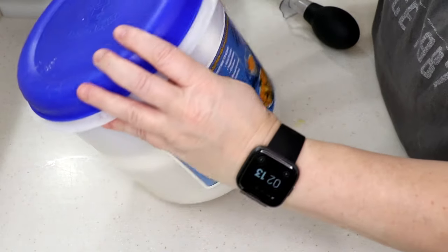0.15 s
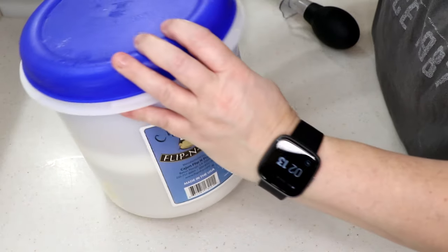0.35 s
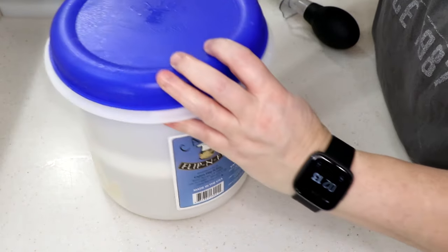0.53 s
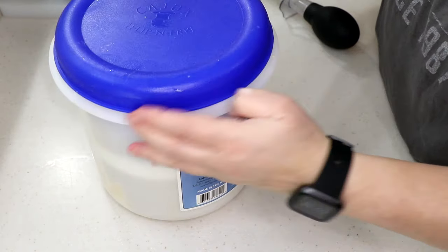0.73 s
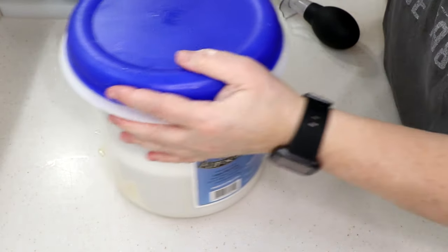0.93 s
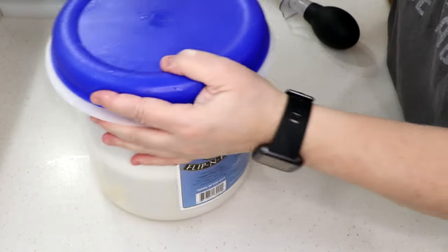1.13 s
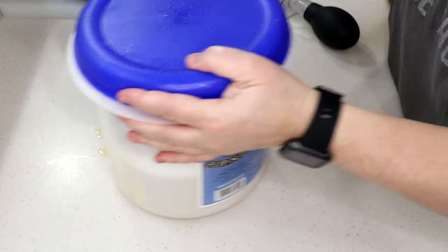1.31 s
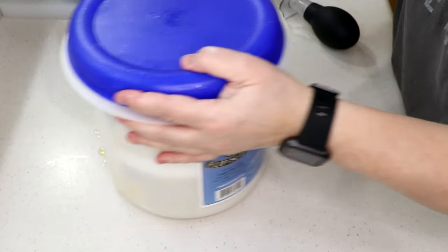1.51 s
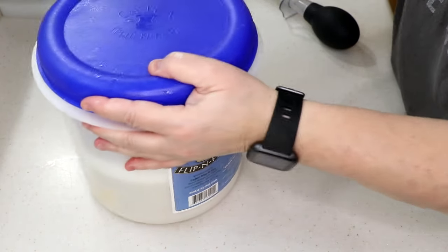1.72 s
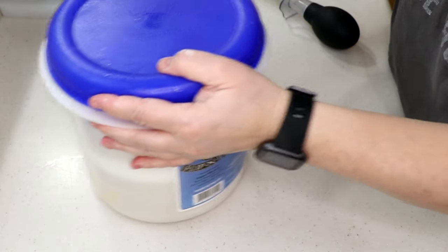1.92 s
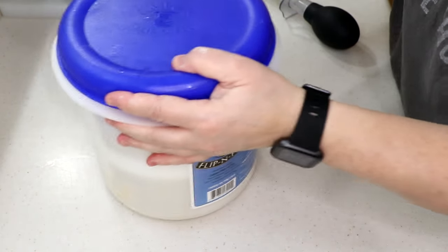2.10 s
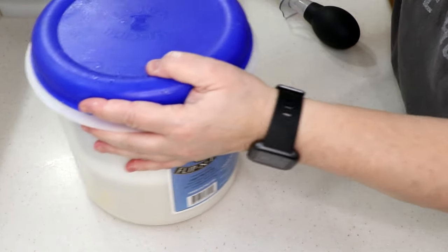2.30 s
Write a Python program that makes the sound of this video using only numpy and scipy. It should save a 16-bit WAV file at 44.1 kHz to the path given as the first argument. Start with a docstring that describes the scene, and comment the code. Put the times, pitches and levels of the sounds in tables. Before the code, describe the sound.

A lidded plastic tub lands on a counter with a hollow boom, fingers squeak briefly on the lid, then quick to-and-fro scraping with knocks and lid ticks; close microphone, small kitchen, faint hum.

```python
"""Mains hum and room noise run throughout. A lidded plastic tub is set down on a kitchen counter:
its base thumps and scrapes (struck modes, filtered grit). Fingers then slip on the lid as it is
gripped (stuttering clicks through resonances). Last the tub is shuffled to and fro: strokes of
scraping, further thumps, and pitched ticks of the loose lid. A short diffuse tail follows the tub."""
import sys
import numpy as np
from scipy import signal
from scipy.fft import rfft, irfft
from scipy.io import wavfile
from scipy.ndimage import uniform_filter1d

SR = 44100
rng = np.random.default_rng(int(sys.argv[2]) if len(sys.argv) > 2 else 0)


def dump(signal):
    """Clip the signal to [-1, 1] and save it as 16-bit WAV at the path in sys.argv[1]."""
    limited = np.clip(np.atleast_2d(signal).T, -1, 1)
    pcm = np.round(limited * 32767).astype(np.int16)
    wavfile.write(sys.argv[1], SR, pcm)


N = 103635

# mains hum partials: multiple, level_db
HUM_PARTIALS = [(1, -44), (3, -49.5), (4, -61.5), (5, -60), (6, -67.5), (7, -58.5), (10, -63)]
HUM_HZ = 60

# room noise spectrum: freq_hz, density_db_per_hz
AIR_SPECTRUM = [(15, -73), (25, -23.5), (64, -5), (91, -32), (179, -4.5), (234, -14.5), (360, -7),
                (391, -18.5), (540, -19), (1000, -23), (15700, -44)]
AIR_DB = -46.5
ROOM_DB, ROOM_T60_S = -11.5, 0.43

# lid ticks: start_s, level_db, pitch_hz
TICKS = [(1.077, -25, 1570), (1.154, -33, 1435), (1.177, -31, 1390), (1.2133, -27, 1544),
         (1.337, -15, 1603), (1.4595, -26, 1575), (1.557, -30, 1400), (1.7455, -29.5, 1503),
         (1.7605, -23, 1497), (1.9151, -21.5, 1535), (1.9937, -32.5, 1410), (2.0413, -25.5, 1506),
         (2.195, -21.5, 1590), (2.3216, -26, 1545)]
# lid modes: ratio_to_pitch, level_db, t60_s
LID_MODES = [(1.0, 0, .03), (1.45, -11, .02), (2.3, -20, .015), (.38, -14, .03)]
TICK_RISE_S = 0.00044

# fingers slipping on the lid: start_s, length_s, level_db, strongest_near_hz
SLIPS = [(.665, .007, -48, 4460), (0.675, 0.0034, -44, 2270), (.812, 0.0057, -29, 1970),
         (.8215, 0.0058, -27.5, 2280), (0.8269, 0.0046, -24.5, 2860), (0.8336, 0.0039, -33.5, 1880),
         (0.842, .01, -39, 3320), (.860, 0.0043, -34, 2620), (.867, 0.0016, -43, 2500)]
# lid resonances under the fingers: freq_hz, width_hz, level_db
SLIP_PEAKS = [(1785, 320, 6), (2230, 230, 4), (2830, 190, 2), (4000, 160, -2), (5700, 900, 4)]
# slip fizz spectrum: freq_hz, density_db_per_hz
SLIP_SPECTRUM = [(400, 7), (1500, -11), (7000, -11), (15500, -16)]
SLIP_FIZZ_DB, SLIP_TOP_HZ, SLIP_TAIL_S = -11, 6750, 0.0021
SPOT_DB = -14  # fall one octave away from the strongest pitch

# base sliding on the counter: start_s, length_s, fastest_at_share, level_db, mid_rel_db, rumble_rel_db
STROKES = [(0.212, 0.26, 0.34, -56.5, 9.5, 8.5), (0.749, 0.26, 0.4, -56.5, 0, -20),
           (0.951, 0.16, 0.59, -39, -7.5, -4), (1.108, 0.15, 0.58, -41.5, -2.5, 0),
           (1.257, 0.12, 0.55, -38.5, -1.5, 0.5), (1.368, 0.15, 0.57, -39.5, -2, 1),
           (1.526, 0.13, 0.46, -42, 0, 5.5), (1.65, 0.16, 0.52, -43, -2, 1.5),
           (1.822, 0.11, 0.41, -44.5, 0, 6.5), (1.927, 0.16, 0.61, -44.5, -0.5, 1.5),
           (2.096, 0.12, 0.49, -45.5, 3.5, 4), (2.219, 0.15, 0.56, -46.5, 0, 4.5)]
# sliding hiss spectrum: freq_hz, density_db_per_hz
HISS_SPECTRUM = [(1290, -2.5), (2200, -37.5), (2750, -12), (2960, -11), (3130, -6.5), (3540, -0.5),
                 (4500, -8.5), (5480, -0.5), (7240, -13), (14700, -21.5), (15700, -34)]
# wall resonances while sliding, before shift per stroke: freq_hz, width_hz, level_db
SCRAPE_PEAKS = [(560, 62, 2), (895, 40, 1.5), (1224, 620, 4.5), (1484, 51, 4), (1790, 50, -6.5)]
# low resonances while sliding: freq_hz, width_hz, level_db
RUMBLE_PEAKS = [(46.4, 41, 0), (127, 54, -12), (206.6, 15, -4.5), (331, 110, -5)]
GRIT_PER_S, GRIT_DB, BUMPS_PER_S, BUMP_DB = 14000, 1.5, 1500, 2.5
SCRAPE_SHIFT = 0.04  # random pitch shift per stroke, standard deviation as a share
UNEVEN_DB, UNEVEN_S = 1.3, 0.016
SPEED_POWER = 0.71  # stroke gain = speed ** this
FIZZ_FROM_HZ, FIZZ_POWER = 4540, 0.78

# base meets counter: start_s, boom_db, boom_rise_s, wall_db, crack_db
THUMPS = [(0.213, -33, 0.0036, -44, -54), (0.2393, 0, 0.0019, -9, -24), (0.299, -13.5, 0.0033, -40, -49),
          (0.3789, -24, 0.0045, -40, -43), (0.456, -36, .006, -53, -68), (.664, -37, 0.0026, -28, -44),
          (.674, -24.5, 0.00054, -34.5, -40), (0.988, -41, 0.0038, -21, -43),
          (1.114, -34.5, 0.004, -31, -66), (1.270, -25, 0.0022, -29, -40.5), (1.283, -36, 0.0018, -34, -57),
          (1.332, -21, 0.0013, -23.5, -28.5), (1.458, -29.5, 0.0042, -49, -49),
          (1.574, -28, 0.0008, -31, -30.5), (1.580, -24.5, 0.0016, -12, -45),
          (1.589, -30.5, 0.00076, -18, -43), (1.8727, -29.5, 0.0029, -5.5, -43),
          (1.878, -38, 0.00099, -36, -33), (1.997, -31.5, 0.0025, -33.5, -40)]
# air and base modes, settled, ungripped: freq_hz, level_db, t60_s
BOOM_MODES = [(89, -13, .1), (140.6, -0.5, 0.061), (197.2, 1, 0.21), (261, -18.5, 0.16), (346, -22, .15)]
# wall modes, ungripped: freq_hz, level_db, t60_s
WALL_MODES = [(401, 6, 0.026), (498, -6, .05), (606, -3, .04), (697, -18.5, 0.035), (812, -4.5, .03),
              (1327, -4.5, 0.034), (1543, 6.5, .016)]
WALL_RISE_S, CRACK_T60_S, CRACK_TOP_HZ, LOW_CUT_HZ = 0.0033, 0.024, 4860, 44.5
SHARP, SHARP_S = 0.22, 0.0083  # base starts sharp under load (share of pitch) and settles
FREE_S, SETTLE_S = 0.043, 0.013  # boom rings freely, then contents and counter smother it
GRIPPED_S, GRIP_DAMP = 1, 0.63  # once both hands hold on, boom and wall t60 shrink by this factor
SOFT = 0.27  # a slower contact dulls the wall modes: blow length as share of rise

EDGE_HZ = 15860
RING_TIME_S = np.arange(SR // 3) / SR


def amp(db):
    """Decibels to amplitude."""
    return 10 ** (np.asarray(db, float) / 20)


def evened(x):
    """Scales x to unit RMS."""
    return x / np.sqrt(np.mean(x ** 2) + 1e-20)


def add(mix, start_s, sound):
    """Adds sound into mix in place, cut at the end."""
    part = mix[round(start_s * SR):][:len(sound)]
    part += sound[:len(part)]


def colour(x, points):
    """Filters x by a spectrum of (freq_hz, db) points, interpolated over log frequency; unit RMS."""
    hz = np.fft.rfftfreq(len(x), 1 / SR)
    point_hz, point_db = np.transpose(points)
    gain_db = np.interp(np.log(hz + 1), np.log(point_hz + 1), point_db)
    return evened(irfft(rfft(x) * amp(gain_db), len(x)))


def resonate(x, peaks):
    """Sum of band-pass resonances (freq_hz, width_hz, level_db), unit RMS."""
    bands = (amp(db) * evened(signal.lfilter(*signal.iirpeak(hz, hz / width_hz, SR), x))
             for hz, width_hz, db in peaks)
    return evened(sum(bands))


def ring(modes, pitch=1, sharp=0, damp=1):
    """Dying sines of an object struck once; they may start sharp."""
    t = RING_TIME_S
    bent_s = t + sharp * SHARP_S * (1 - np.exp(-t / SHARP_S))
    return sum(amp(db - 60 * t / (t60_s * damp)) * np.sin(2 * np.pi * f * pitch * bent_s)
               for f, db, t60_s in modes)


def grit(per_s, spread_db):
    """Dense random clicks of uneven size."""
    size = amp(spread_db * np.minimum(rng.exponential(1, N), 4))
    return size * rng.standard_normal(N) * (rng.random(N) < per_s / SR)


def kitchen():
    """Mains hum of an appliance, as steady harmonics, over steady room noise."""
    t = np.arange(N) / SR
    hum = sum(amp(db) * np.sin(2 * np.pi * (k * HUM_HZ * t + rng.random())) for k, db in HUM_PARTIALS)
    return hum + amp(AIR_DB) * colour(rng.standard_normal(N), AIR_SPECTRUM)


def room(x):
    """A short diffuse tail: x convolved with decaying, darkened noise."""
    t = np.arange(SR // 2) / SR
    noise = signal.lfilter([1], [1, -.6], rng.standard_normal(len(t)))
    tail = noise * amp(-60 * t / ROOM_T60_S) * (t > .004)
    return signal.fftconvolve(x, tail / np.linalg.norm(tail))[:N]


def ticks():
    """The loose lid taps the rim and rings its modes."""
    out = np.zeros(N)
    rise = (1 - np.exp(-RING_TIME_S / TICK_RISE_S)) ** 2
    for start_s, db, pitch_hz in TICKS:
        add(out, start_s, amp(db) * ring(LID_MODES, pitch_hz) * rise)
    return out


def slips():
    """Short bursts of skin stuttering on plastic ring the lid; each spot favours other modes."""
    out, t = np.zeros(N), np.arange(SR // 20) / SR
    stutter = grit(7000, 0.66)
    fizz = amp(SLIP_FIZZ_DB) * colour(rng.standard_normal(N), SLIP_SPECTRUM)
    top_cut = signal.butter(4, SLIP_TOP_HZ, fs=SR)
    for start_s, length_s, db, near_hz in SLIPS:
        attack = np.clip(t / 0.001, 0, 1)
        release = np.exp(-np.maximum(t - length_s, 0) / SLIP_TAIL_S)
        spot = [(hz, width_hz, peak_db + SPOT_DB * np.log2(hz / near_hz) ** 2)
                for hz, width_hz, peak_db in SLIP_PEAKS]
        lid = signal.lfilter(*top_cut, resonate(stutter, spot))
        burst = (lid + fizz)[round(start_s * SR):][:len(t)]
        add(out, start_s, amp(db) * attack * release * burst)
    return out


def uneven():
    """Slow random change of grip pressure, as a gain drawn separately for three bands."""
    size = round(UNEVEN_S * SR)
    drift = uniform_filter1d(uniform_filter1d(rng.standard_normal((3, N)), size), size)
    return amp(UNEVEN_DB * evened(drift))


def slide():
    """Grit under the base: hiss, wall scrape and low bumps swell per stroke; top fizz needs speed."""
    t = np.arange(N) / SR
    gates, pace, scrape = np.zeros((3, N)), np.zeros(N), np.zeros(N)
    shifts = SCRAPE_SHIFT * rng.standard_normal(len(STROKES))
    fine, coarse = grit(GRIT_PER_S, GRIT_DB), grit(BUMPS_PER_S, BUMP_DB)
    for (start_s, length_s, fastest, db, mid_db, low_db), shift in zip(STROKES, shifts):
        progress = np.clip((t - start_s) / length_s, 0, 1)
        skew = np.log(.5) / np.log(fastest)  # puts the top speed at that share of the stroke
        speed = np.abs(np.sin(np.pi * progress ** skew))
        gates += amp([[db], [db + mid_db], [db + low_db]]) * speed ** SPEED_POWER
        pace = np.maximum(pace, speed)
        peaks = np.multiply(SCRAPE_PEAKS, [1 + shift, 1, 1])
        begun = t > start_s
        scrape[begun] = resonate(coarse + 1.03 * fine, peaks)[begun]
    gates *= uneven()
    hiss = colour(fine, [(900, -63)] + HISS_SPECTRUM)
    dull = signal.filtfilt(*signal.butter(2, FIZZ_FROM_HZ, fs=SR), hiss)
    hiss = dull + (hiss - dull) * pace ** FIZZ_POWER
    return gates[0] * hiss + gates[1] * scrape + gates[2] * resonate(coarse, RUMBLE_PEAKS)


def thumps():
    """Each contact rings the air and base of the tub, its walls, and gives a short noise crack."""
    out, t = np.zeros(N), RING_TIME_S
    smother = np.exp(-(np.maximum(t - FREE_S, 0) / SETTLE_S) ** 2)
    crack_band = signal.butter(3, [450, CRACK_TOP_HZ], "band", fs=SR)
    cracks = signal.lfilter(*crack_band, rng.standard_normal((len(THUMPS), len(t))))
    cracks = signal.lfilter([1], [1, -.85], cracks)  # darker
    for (start_s, boom_db, rise_s, wall_db, crack_db), crack in zip(THUMPS, cracks):
        damp = GRIP_DAMP if start_s > GRIPPED_S else 1
        boom = ring(BOOM_MODES, sharp=SHARP, damp=damp) * smother * (1 - np.exp(-t / rise_s))
        blow = np.hanning(round(SOFT * rise_s * SR) + 3)
        wall = ring(WALL_MODES, damp=damp) * (1 - np.exp(-t / WALL_RISE_S))
        wall = signal.lfilter(blow / blow.sum(), 1, wall)
        crack = amp(crack_db - 60 * t / CRACK_T60_S) * crack
        add(out, start_s, amp(boom_db) * boom + amp(wall_db) * wall + crack)
    return signal.lfilter(*signal.butter(2, LOW_CUT_HZ, "high", fs=SR), out)


def scene():
    """Tub, lid ticks and kitchen; only the tub above 500 Hz feeds the room tail."""
    tub = thumps() + slips() + slide()
    high = signal.lfilter(*signal.butter(2, 500, "high", fs=SR), tub)
    return (tub + ticks() + amp(ROOM_DB) * room(high) + kitchen())[None]


def record(dry):
    """Band limit of the recorder: a steep linear-phase low-pass."""
    low_pass = signal.firwin(1023, EDGE_HZ, window=("kaiser", 10), fs=SR)
    return signal.oaconvolve(dry, low_pass[None], "same")


dry = scene()
out = record(dry)
dump(out)
```